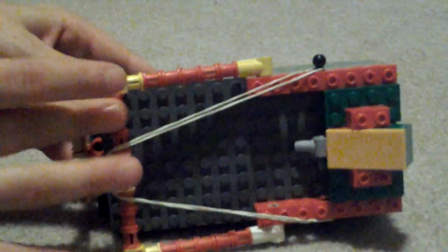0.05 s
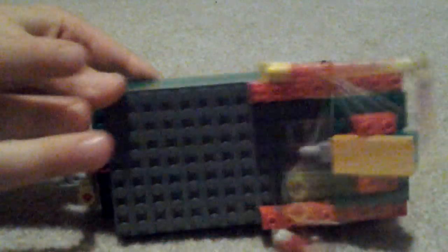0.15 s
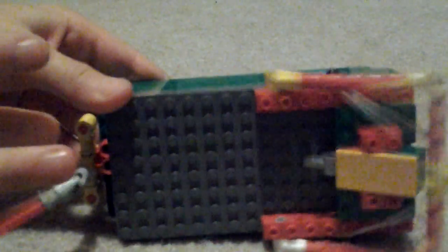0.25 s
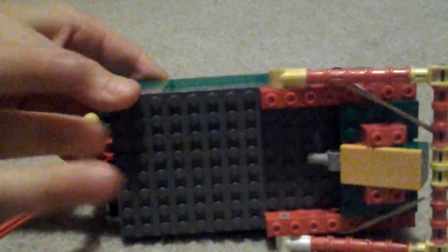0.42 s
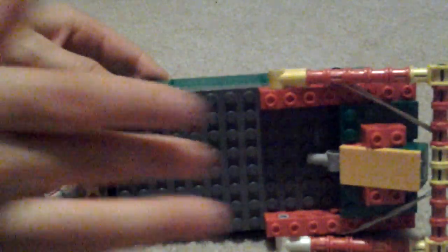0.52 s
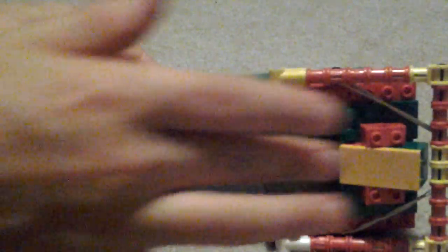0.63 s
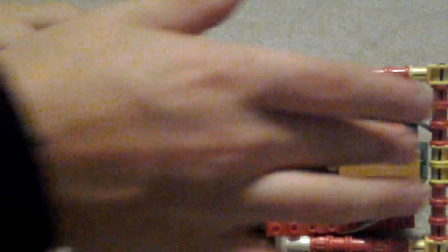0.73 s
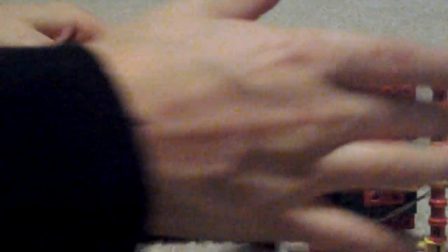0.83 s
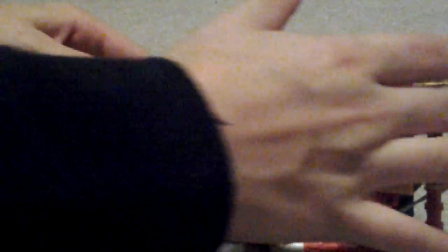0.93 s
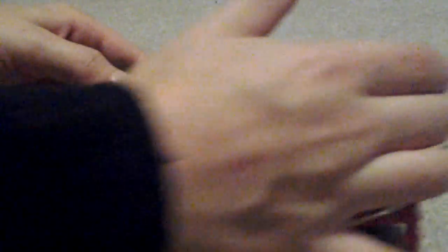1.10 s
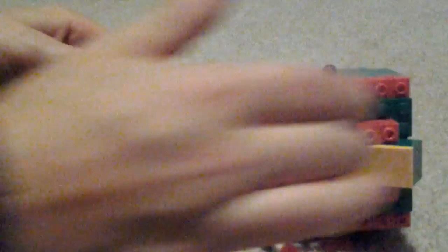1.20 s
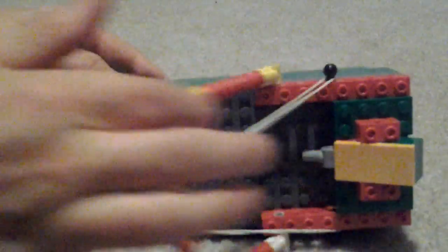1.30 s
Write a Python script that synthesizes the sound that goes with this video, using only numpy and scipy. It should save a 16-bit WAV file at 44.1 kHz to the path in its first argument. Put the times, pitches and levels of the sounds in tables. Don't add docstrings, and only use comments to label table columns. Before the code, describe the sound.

A plastic brick mousetrap snaps shut with a loud clack, then rattles through quick fading rebounds.

```python
import sys
import numpy as np
from scipy import signal
from scipy.io import wavfile
from scipy.ndimage import uniform_filter1d

SR = 44100
rng = np.random.default_rng(int(sys.argv[2]) if len(sys.argv) > 2 else 0)


def how_loud(loudness_db):
    steps = np.asarray(loudness_db, float) / 20
    return 10 ** steps


def unload_audio(sound):
    columns = np.transpose(np.atleast_2d(sound))
    steps = np.round(np.clip(columns, -1, 1) * 32767)
    wavfile.write(sys.argv[1], SR, steps.astype(np.int16))


N = 59535

# freq_hz, density_db
HISS_SPECTRUM = [(15, -57), (25, -50), (95, -4.5), (176, -3.5), (373, -8), (879, -12), (1240, -13.5),
                 (13800, -26), (15000, -25)]
# time_s, level_db
MURMUR_DRIFT = [(0, -8), (.3, -1.5), (.7, -5), (1.1, -3.5), (1.35, -8)]
# time_s, level_db
ARM_SWING = [
    (.17, -78),
    (.19, -51),
    (.2, -38),
    (.205, -25),
    (.21, -62),
    (.215, -80),
]
# start_s, knock_db, thump_db, chatter_db, chatter_colour_hz
LANDINGS = [
    (0.2101, -8, -30.5, -17.5, 4300),
    (.2705, -10, -28.5, -19, 5400),
    (0.3261, -9, -24, -24, 5600),
    (0.3783, -15, -30, -28.5, 3820),
    (.4290, -20.5, -30, -31.5, 3520),
    (0.478, -21, -27.5, -37.5, 3900),
    (.5270, -27.5, -33, -42.5, 4800),
    (1.0156, -35, -75, -77, 4370),
    (1.0230, -44, -43.5, -51, 5200),
]
# start_s, level_db, pitch_hz, knock_db
CLACKS = [(.2030, -34, 6550, -24), (.2099, -10, 988, -54), (0.2103, -7.5, 7160, -40),
          (0.2102, -14, 2700, -48), (.2155, -15, 3580, -48), (0.2302, -10.5, 2810, -19.5),
          (0.2348, -11.5, 4880, -38), (.2712, -11, 3100, -49), (0.275, -12, 3450, -25),
          (.2880, -11.5, 3100, -17.5), (0.2999, -12, 6700, -32), (0.3269, -8.5, 7200, -46),
          (.3290, -20, 590, -48), (.3320, -6, 7900, -28), (0.3402, -14.5, 4640, -32),
          (.3460, -12.5, 3546, -41), (0.3802, -15, 2777, -34), (.3810, -19, 6900, -39),
          (.3958, -21, 2900, -33), (.3995, -13, 3300, -25), (.4315, -25, 6700, -19.5),
          (0.437, -21, 3130, -28.5), (0.479, -21.5, 6900, -36), (0.499, -27.5, 4360, -34.5),
          (.5310, -38, 6850, -57), (1.0163, -41.5, 2720, -70), (1.0235, -37, 1110, -80),
          (1.0228, -42, 5650, -70), (1.0325, -57, 2870, -40), (1.0400, -45, 4460, -64)]
# freq_hz, level_db, t60_s
BASE_MODES = [(327.6, -12.5, 0.06), (590, -7, 0.057), (838, -6, 0.022), (1005, 2.5, 0.015),
              (1224, 4, 0.017), (1602, -12, .02)]
# freq_hz, level_db, t60_s
BRICK_MODES = [(1320, 1.5, 0.0081), (1830, -6.5, 0.0074), (2482, 0.5, 0.012), (2735, -4.5, 0.029),
               (3100, -2, 0.016), (3448, -2.5, 0.023), (4070, -3, 0.013), (4805, -2.5, 0.017),
               (5590, -1, 0.0074), (6395, -1.5, 0.018), (7255, 4, 0.0095), (8520, 4.5, 0.0046),
               (9940, 2, 0.0036), (11780, 0, 0.0035)]
# freq_hz, t60_s
ROOM_DECAY = [(200, 0.059), (1000, 0.23), (4000, 0.11), (12000, 0.36)]

HISS_DB, ROOM_DB = -54.5, -6
CHATTER_PER_S, UNEVEN_DB, SWING_COLOUR_HZ = 8000, 3.5, 2950
BRICK_COPIES, BRICK_DETUNE, BASE_DETUNE = 6, 0.062, 0.016
FOCUS_DB = 3.5
AIR_DB, AIR_HZ = -3, 8900
SETTLE_DB, SETTLE_S = 5.5, 0.015
SWELL_WAIT_S, SWELL_RISE_S, SWELL_FALL_S = 0.019, 0.003, 0.013
CLACK_RISE_S, KNOCK_RISE_S = 0.00043, 0.00014
SOFTEN_S = 0.00021
THUMP_HZ, THUMP_S, THUMP_WAIT_S = 200, 0.011, 0.00012
THUMP_LAG_S = 0.00046
LOW_CUT_HZ, EDGE_HZ, RING_SAMPLES = 264, 14700, 2500
GATE_TOP_HZ, GATE_TOP_DB, GATE_BASS_HZ, GATE_BASS_DB = 11400, -18, 130, -11


def evened(x):
    return x / np.sqrt(np.mean(x ** 2) + 1e-20)


def read(points, hz):
    f, value = np.transpose(points)
    return np.interp(np.log(hz + 1), np.log(f + 1), value)


def add(mix, start_s, sound):
    part = mix[round(start_s * SR):][:len(sound)]
    part += sound[:len(part)]


def high_pass(x, hz):
    return signal.sosfilt(signal.butter(2, hz, "high", fs=SR, output="sos"), x)


def ring(hz, level_db, t60_s, rise_s=1 / SR):
    t = np.arange(RING_SAMPLES) / SR
    return how_loud(level_db - 60 * t / t60_s) * np.sin(2 * np.pi * hz * t) * (1 - np.exp(-t / rise_s))


def hiss():
    frames, hz = N // 256 + 5, np.fft.rfftfreq(1024, 1 / SR)
    real, imag, patches = rng.standard_normal((frames, 513, 3)).T
    patches = evened(uniform_filter1d(uniform_filter1d(patches, 10, 0), 10, 1))
    drift_db = np.interp(np.arange(frames) * 256 / SR, *np.transpose(MURMUR_DRIFT))
    drift_db = drift_db / (1 + (hz[:, None] / 8000) ** 4)
    z = (real + 1j * imag) * how_loud(read(HISS_SPECTRUM, hz)[:, None] + 1.1 * patches + drift_db)
    noise = signal.istft(z, nperseg=1024, noverlap=768)[1][:N]
    return how_loud(HISS_DB) * evened(noise)


def chatter(level, colour_hz):
    hits = (rng.random(N) < CHATTER_PER_S / SR) * rng.choice([-1, 1], N)
    hits = level * hits * how_loud(UNEVEN_DB * np.minimum(rng.exponential(1, N), 3))
    modes = BRICK_COPIES * BRICK_MODES
    which = rng.integers(0, len(modes), N)
    detune = BRICK_DETUNE * rng.uniform(-1.13, 1, len(modes))
    rings = np.zeros(N)
    for k, (hz, db, t60_s) in enumerate(modes):
        focus = how_loud(-FOCUS_DB * np.log2(hz / colour_hz) ** 2)
        mode = ring(hz * (1 + detune[k]), db, t60_s)
        rings += signal.oaconvolve(hits * (which == k) * focus, mode)[:N]
    return how_loud(-11) * (rings + how_loud(AIR_DB) * high_pass(hits, AIR_HZ))


def clack(level_db, hz, luck):
    t60_s = 0.017 * (3000 / hz) ** 0.13
    out = ring(hz * 1.7, level_db - 20, 0.007)
    for a, b, _ in luck[::2]:
        out = out + ring(hz * (1 + 0.059 * a), level_db - 8.5 + 3 * b, t60_s, CLACK_RISE_S)
    return out


def knock(level_db, luck, uneven_db=3):
    rise_s = abs(KNOCK_RISE_S - SOFTEN_S * level_db / 10)
    out = np.zeros(RING_SAMPLES)
    for (hz, db, t60_s), (a, b, _) in zip(BASE_MODES, luck):
        out += ring(hz * (1 + BASE_DETUNE * a), level_db + db + uneven_db * b - 6.5, t60_s, rise_s)
    return out


def thump(level_db):
    t = np.arange(0, THUMP_S, 1 / SR)
    cycles = np.sin(2 * np.pi * THUMP_HZ * t) + 0.49 * np.sin(2 * np.pi * THUMP_HZ * 1.548 * t)
    return -how_loud(level_db + 4.5) * np.sin(np.pi * t / THUMP_S) ** 2 * cycles


def trap():
    out, t = np.zeros(N), np.arange(N) / SR
    shake = how_loud(np.interp(t, *np.transpose(ARM_SWING), left=-120, right=-120))
    colour_hz = SWING_COLOUR_HZ * np.ones(N)
    luck = rng.uniform(-1.5, 1, (len(LANDINGS), len(BASE_MODES), 3))
    for (start_s, knock_db, thump_db, chatter_db, hz), row in zip(LANDINGS, luck):
        add(out, start_s, knock(knock_db, row))
        add(out, start_s + THUMP_WAIT_S - THUMP_LAG_S * knock_db / 10, thump(thump_db))
        u = np.clip(t - start_s - SWELL_WAIT_S, -1, 1)
        swell = 2 / (np.exp(-u / SWELL_RISE_S) + np.exp(u / SWELL_FALL_S))
        settle = how_loud(SETTLE_DB) * np.exp(-abs(t - start_s) / SETTLE_S)
        shake = shake + how_loud(chatter_db) * (t > start_s) * (swell + settle)
        colour_hz = np.where(t > start_s, hz, colour_hz)
    luck = rng.uniform(-1, 1, (len(CLACKS), len(BASE_MODES), 3))
    for (start_s, level_db, hz, knock_db), row in zip(CLACKS, luck):
        add(out, start_s, clack(level_db, hz, row) + knock(knock_db, row))
    return high_pass(out + chatter(shake, colour_hz), LOW_CUT_HZ)


def room(x):
    taps = np.zeros(SR // 2)
    at = np.arange(200, SR // 2 - 20, 20)
    taps[at + rng.integers(0, 20, len(at))] = rng.choice([-1., 1.], len(at))
    hz, t, z = signal.stft(taps, SR, nperseg=256)
    tail = signal.istft(z * how_loud(-60 * t / read(ROOM_DECAY, hz)[:, None]), SR, nperseg=256)[1]
    return signal.fftconvolve(x, tail / np.linalg.norm(tail))[:N]


def scene():
    dry = trap()
    return (dry + how_loud(ROOM_DB) * room(dry) + hiss())[None]


def gate_edges(x):
    hz, _, z = signal.stft(x, SR, nperseg=1024)
    hz = hz[:, None]
    power = abs(z) ** 2
    middle = power[:, 40:200].mean(1, keepdims=True)
    top_db = 10 * np.log10(uniform_filter1d(power, 12, 1) / middle + 1e-12)
    bass_db = 10 * np.log10(power / middle + 1e-12)
    top = np.where(hz > GATE_TOP_HZ, np.clip((top_db - GATE_TOP_DB) / 2, 0, 1), 1)
    bass = np.where(hz < GATE_BASS_HZ, np.clip((bass_db - GATE_BASS_DB) / 2, 0, 1), 1)
    return signal.istft(z * top * bass, SR, nperseg=1024)[1][:, :N]


def band_limit(x):
    return signal.sosfilt(signal.butter(12, 15420, fs=SR, output="sos"), x)


def record(dry):
    low_pass = signal.firwin(511, EDGE_HZ, window=("kaiser", 9), fs=SR)
    mix = gate_edges(signal.oaconvolve(dry, low_pass[None], "same"))
    return band_limit(mix)


dry = scene()
out = record(dry)
unload_audio(out)
```